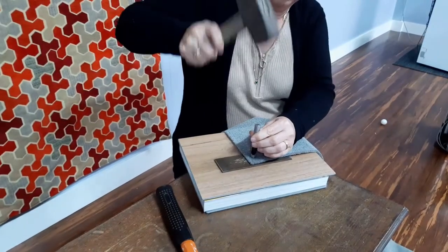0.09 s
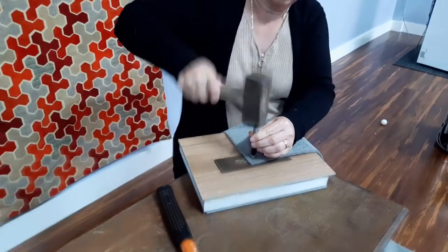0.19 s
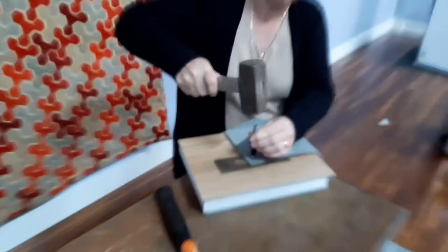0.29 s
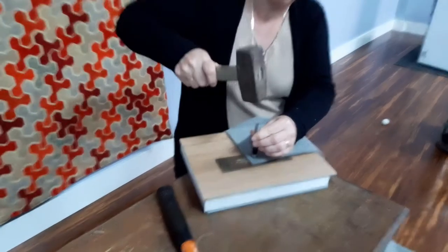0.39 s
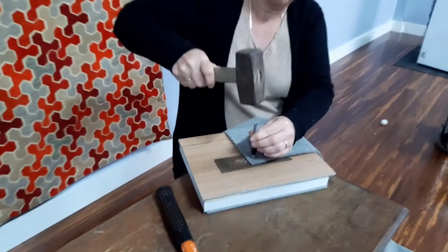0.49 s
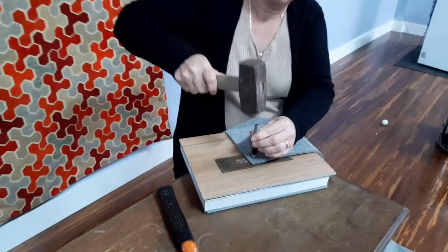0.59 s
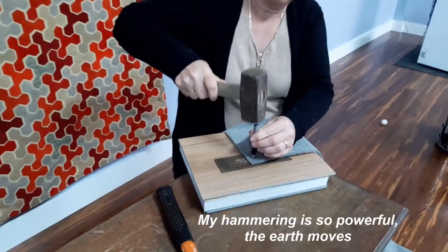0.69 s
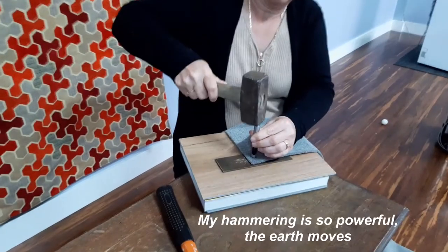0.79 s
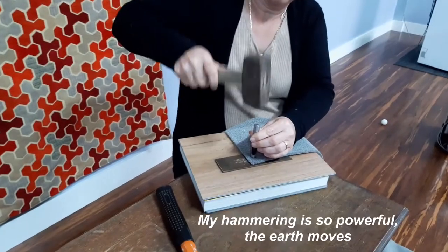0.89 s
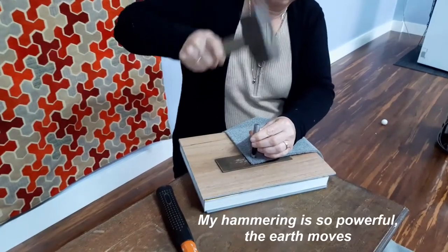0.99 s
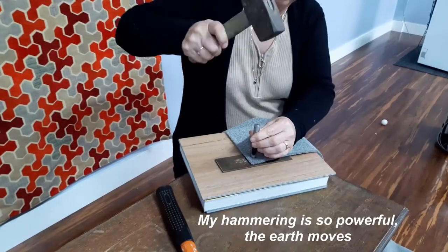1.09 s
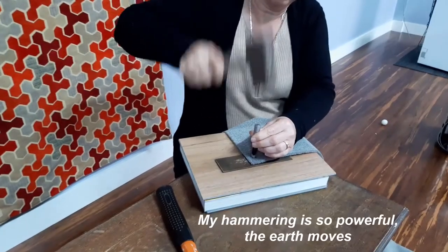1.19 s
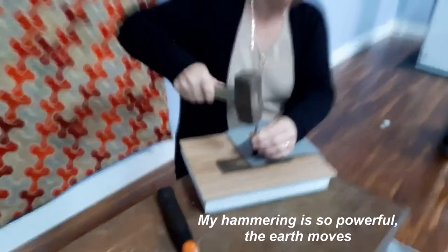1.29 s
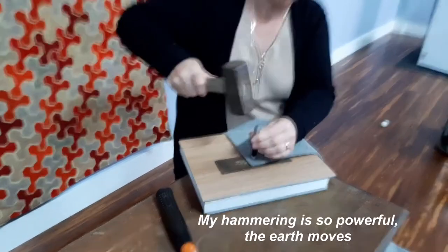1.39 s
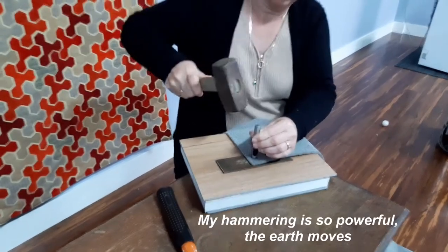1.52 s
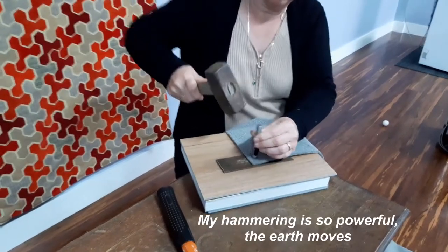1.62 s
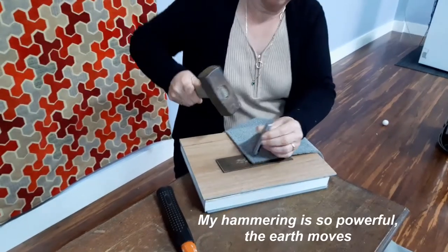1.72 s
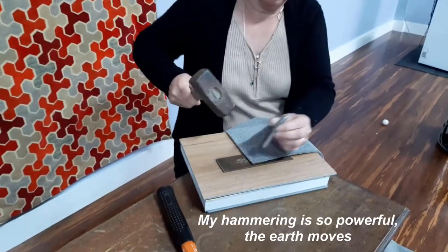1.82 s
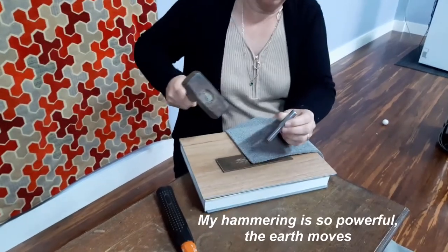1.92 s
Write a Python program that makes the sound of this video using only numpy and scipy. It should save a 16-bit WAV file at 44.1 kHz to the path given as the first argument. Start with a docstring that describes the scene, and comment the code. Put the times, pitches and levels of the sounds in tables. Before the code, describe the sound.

A heavy hammer strikes a steel punch twice, with a light tap between, echoing indoors.

```python
"""A heavy hammer drives a steel hole punch through fabric on a desk: two hard blows, a light tap between.
Each contact is a short steel crack, repeated by a near wall, and a knock of the desk.
The punch keeps a thin high ring; a long reverberation swells behind each blow and dies slowly.
An earlier blow and tap are still fading at the start, over quiet room air."""
import sys
import numpy as np
from scipy import signal
from scipy.fft import rfft, irfft
from scipy.io import wavfile
from scipy.ndimage import map_coordinates

SR = 44100
rng = np.random.default_rng(int(sys.argv[2]) if len(sys.argv) > 2 else 0)


def wav_out(sig):
    """Save sig, one row per channel (or a flat mono array), as 16-bit PCM at SR to the path in sys.argv[1]."""
    wavfile.write(sys.argv[1], SR, np.round(np.clip(np.atleast_2d(sig).T, -1, 1) * 32767).astype(np.int16))


N = 88200
T = np.arange(2 * SR + SR // 4) / SR
BIN_HZ = np.fft.rfftfreq(len(T), 1 / SR)


def amp(db):
    """Decibels to gain."""
    return 10 ** (np.asarray(db) / 20)


def along(points, hz):
    """Interpolate (freq_hz, value) points on a log frequency axis."""
    freqs_hz, values = np.transpose(points)
    return np.interp(np.log(hz + 1), np.log(freqs_hz + 1), values)


def fade(t, t60_s):
    """Decay of 60 dB in t60_s."""
    return np.exp(-np.log(1000) * t / t60_s)


def add(out, x, start_s):
    """Mix x into out from start_s, which may be negative."""
    i = round(start_s * SR)
    x = x[..., max(-i, 0):out.shape[-1] - i]
    out[:, max(i, 0):max(i, 0) + x.shape[-1]] += x


# Left-right likeness of room sound: freq_hz, correlation
ROOM_CORRELATION = [(60, 0.8), (130, 0.89), (280, 0.91), (500, 0.6), (1000, 0.033), (10000, 0)]
def noise(spectrum, correlation=ROOM_CORRELATION):
    """Unit-rms stereo noise of given spectrum and left-right correlation."""
    angle = np.arccos(np.clip(along(correlation, BIN_HZ), -1, 1)) / 2
    shaped = rfft(rng.standard_normal((2, len(T)))) * amp(along(spectrum, BIN_HZ))
    mid, side = irfft(shaped * [np.cos(angle), np.sin(angle)], len(T))
    pair = np.array([mid + side, mid - side])
    return pair / pair.std()


# Room air spectrum: freq_hz, density_db
AIR_SPECTRUM = [(25, -8), (80, -6), (240, 3), (900, -17), (2000, -47), (8000, -33), (15000, -60)]
def room_air(level_db=-68):
    """Steady low background noise."""
    return amp(level_db) * noise(AIR_SPECTRUM)[:, :N]


def swell(onset_s=0.0017, middle_s=0.043, width_s=0.0062, early_db=-8.5):
    """Envelope: weak early sound builds to full reverberation."""
    early = amp(early_db)
    build = (1 + np.tanh((T - middle_s) / width_s / 2)) / 2
    return np.minimum(T / onset_s, 1) * (early + (1 - early) * build)


# Room decay: freq_hz, t60_s
REVERB_DECAY = [(60, 1.23), (250, 1.477), (900, 1.638), (2000, 1.3), (4000, 1.084), (7000, 0.93),
                (10000, 0.59), (15000, 0.43)]
def reverb(spectrum):
    """Diffuse reverberation; the treble dies first."""
    hz, t, frames = signal.stft(noise(spectrum), SR, nperseg=512)
    decay = fade(t, along(REVERB_DECAY, hz)[:, None])
    _, tail = signal.istft(frames * decay, SR, nperseg=512)
    return tail[:, :len(T)] * swell()


# Low room resonances: pitch_hz, level_db, t60_s
ROOM_RESONANCES = [(220.1, -22, 1.71), (284.8, -21, 1.51), (319.3, -23, 1.05), (368.3, -33, 1.07),
                   (559, -28, 1.4)]
def room_modes():
    """Long resonances that build with the reverberation."""
    return swell() * sum(amp(db) * np.sin(2 * np.pi * (hz * T + rng.random())) * fade(T, t60_s)
                         for hz, db, t60_s in ROOM_RESONANCES)


def boom(level_db=-18.5, start_hz=320.6, sag_hz_per_s=1000, peak_s=0.072, width_s=0.044):
    """Low boom that sinks in pitch as the reverberation swells."""
    cycles = start_hz * T - sag_hz_per_s * T ** 2 / 2
    return amp(level_db) * np.sin(2 * np.pi * cycles) * np.exp(-((T - peak_s) / width_s) ** 2)


# Late swell spectrum: freq_hz, density_db
BLOOM_SPECTRUM = [(100, -30.5), (200, 0.5), (330, -1), (420, -12), (570, 1.5), (750, -13.5), (1500, -24),
                  (8000, -58)]
def bloom(level_db=-22.5, peak_s=0.217, width_s=0.031):
    """Second swell in the low mids of the reverberation."""
    return amp(level_db) * noise(BLOOM_SPECTRUM) * np.exp(-((T - peak_s) / width_s) ** 2)


# Reverberation spectrum of a blow: freq_hz, density_db
BLOW_REVERB = [(25, -46), (70, -28), (103, -16), (145, -16), (195, -3.5), (285, -3), (350, -10.5),
               (540, -7.5), (750, -9.5), (1100, -13.5), (1700, -21.5), (2050, -18), (2700, -24),
               (5600, -27), (9500, -30), (12000, -30.5), (15500, -40.5)]
def blow_tail(diffuse_db=-13.5):
    """The room's response to a hard blow."""
    return amp(diffuse_db) * reverb(BLOW_REVERB) + room_modes() + boom() + bloom()


def with_wall(x, delay_s=0.0107, echo_db=-10.5):
    """A contact plus its echo off the near wall."""
    out = x.copy()
    add(out, amp(echo_db) * x, delay_s)
    return out


def punch_ring(pitch_hz=10660, level_db=-44, t60_s=1.41, waver_per_s=8.06, depth=0.64, pan_db=3):
    """Thin high ring of the punch, wavering differently at each ear."""
    waver = depth * np.array([map_coordinates(knots, [T * waver_per_s], mode="wrap")
                              for knots in rng.standard_normal((4, 128))])
    phase = 2 * np.pi * pitch_hz * T
    tone = (1 + waver[:2]) * np.sin(phase) + waver[2:] * np.cos(phase)
    return amp(level_db) * tone * amp([[pan_db], [-pan_db]]) * swell() * fade(T, t60_s)


def knock(modes, rise_s=0.00076):
    """Damped resonances set off by one sharp push."""
    t = T[:SR // 2]
    ringing = sum(amp(db) * np.cos(2 * np.pi * hz * t) * fade(t, t60_s) for hz, db, t60_s in modes)
    return np.pad(-np.minimum(t / rise_s, 1) * ringing, (0, len(T) - len(t)))


def crack(spectrum, level_db, contact_s=0.0023, t60_s=0.0083, correlation=0.067):
    """Steel on steel: a noise burst held for the contact, then dying fast."""
    envelope = fade(np.maximum(T - contact_s, 0), t60_s)
    return amp(level_db) * noise(spectrum, [(1000, correlation)]) * envelope


# Crack and reverberation spectra of a tap: freq_hz, density_db
TAP_CRACK_SPECTRUM = [(100, -25), (600, -1), (1800, -25), (3500, 7.5), (6000, -5), (10500, -11),
                      (15000, -29)]
TAP_REVERB = [(35, -14), (100, 2.5), (160, -5.5), (290, 7), (600, -6), (1500, -33), (2400, -12.5),
              (3600, -3), (4400, -12), (6000, -31), (8500, -20), (10500, -34.5), (15000, -35)]
# Punch shank and desk modes under a tap: pitch_hz, level_db, t60_s
SHANK_MODES = [(2814, -28.5, 0.021), (3330, -27, 0.018), (3680, -22, 0.018), (4480, -30, 0.026),
               (8500, -26, 0.0095)]
TAP_DESK_MODES = [(124, -33, 0.53), (188, -29, 0.19), (288.7, -12.5, 0.085), (390, -20, 0.098),
                  (478, -20.5, 0.075), (717, -26, 0.037)]
def tap(contact_db, reverb_db, ring_db):
    """Hammer set on the punch: the shank clinks, the desk's bass barely moves."""
    steel = crack(TAP_CRACK_SPECTRUM, level_db=-26.5) + knock(SHANK_MODES)
    low_cut = signal.butter(2, 173, "high", fs=SR, output="sos")
    contact = signal.sosfilt(low_cut, with_wall(steel) + knock(TAP_DESK_MODES))
    tail = amp(-37) * reverb(TAP_REVERB)
    return amp(contact_db) * contact + amp(reverb_db) * tail + amp(ring_db) * punch_ring()


def desk_heave(pitch_hz=56.7, level_db=-33.5, peak_s=0.02, ear_phase_rad=1):
    """Slow sway of the desk under a blow."""
    sway = np.sin(2 * np.pi * pitch_hz * T + np.array([[ear_phase_rad], [-ear_phase_rad]]))
    return amp(level_db) * sway * (T / peak_s) ** 2 * np.exp(2 - 2 * T / peak_s)


def steel_colour(x, zing_hz, treble_db, zing_db=4.5, width_hz=1080, shelf_hz=11200):
    """Each blow lands differently: a broad steel zing and a treble shelf."""
    zing = np.exp(-((BIN_HZ - zing_hz) / width_hz) ** 2)
    shelf = 1 / (1 + np.exp((shelf_hz - BIN_HZ) / 1000))
    return irfft(rfft(x) * amp(zing_db * zing + treble_db * shelf), len(T))


# Crack spectrum of a blow: freq_hz, density_db
BLOW_CRACK_SPECTRUM = [(60, -9), (200, -18), (500, 7), (1500, 0.5), (2600, -5.5), (6000, -9), (10000, -10),
                       (15000, -13.5)]
# Hammer-on-punch and desk modes under a blow: pitch_hz, level_db, t60_s
CLANK_MODES = [(1434, -15.5, 0.017), (1964, -16.5, 0.026), (3860, -21, 0.017), (4470, -30, 0.018)]
BLOW_DESK_MODES = [(90.8, -24, 0.2), (111.7, -24, 0.26), (220, -12, .12), (293.6, -7.5, 0.12),
                   (563, -14.5, 0.046), (820, -20, 0.04)]
def blow(tail, contact_db, reverb_db, clank_db, ring_db, zing_hz, treble_db):
    """Full swing: steel cracks and clanks, the desk knocks and heaves, punch and room ring on."""
    steel = crack(BLOW_CRACK_SPECTRUM, level_db=-14.5) + amp(clank_db) * knock(CLANK_MODES)
    contact = with_wall(steel) + knock(BLOW_DESK_MODES) + desk_heave()
    strike = amp(contact_db) * contact + amp(reverb_db) * tail + amp(ring_db) * punch_ring()
    return steel_colour(strike, zing_hz, treble_db)


# Setting taps: start_s, contact_db, reverb_db, ring_db
LIGHT_TAPS = [(-.32, -5, -8.5, -15), (0.7501, -1.5, 0.5, -18)]
# Hammer blows: start_s, contact_db, reverb_db, clank_db, ring_db, zing_hz, treble_db
HARD_BLOWS = [(-0.84, 0, -2, 0, 3, 3800, 7), (.2008, -0.5, 0.5, 3, -6, 5650, 1.5),
              (1.2402, 0.5, 0.65, -10.5, -2.5, 6520, 2)]
def scene(pan_db=0.2):
    """Blows and taps over room air; all blows hit one spot, so they share one tail."""
    tail = blow_tail()
    out = room_air()
    for start_s, *settings in HARD_BLOWS:
        add(out, blow(tail, *settings), start_s)
    for start_s, *settings in LIGHT_TAPS:
        add(out, tap(*settings), start_s)
    return out * amp([[pan_db], [-pan_db]])


LOW_CUT_HZ, TOP_HZ = 46, 16000
def record(dry):
    """Microphone: low cut, soft clip at full scale, band limit."""
    thinned = signal.sosfilt(signal.butter(2, LOW_CUT_HZ, "high", fs=SR, output="sos"), dry)
    clipped = thinned / (1 + np.abs(thinned) ** 8) ** (1 / 8)
    return signal.sosfilt(signal.ellip(10, .1, 90, TOP_HZ, fs=SR, output="sos"), clipped)


dry = scene()
out = record(dry)
wav_out(out)
```